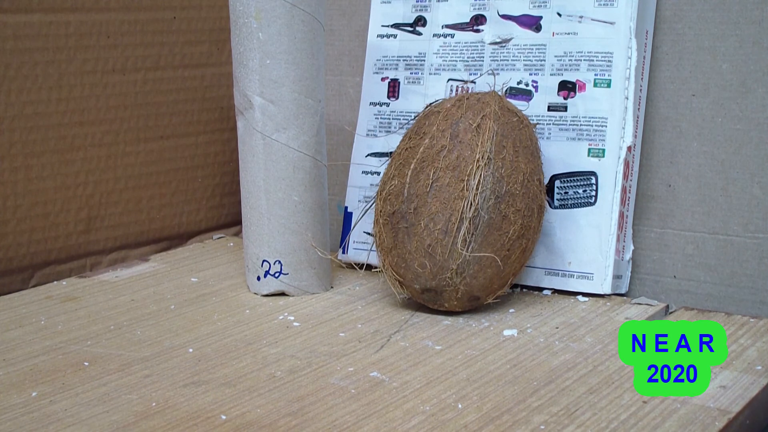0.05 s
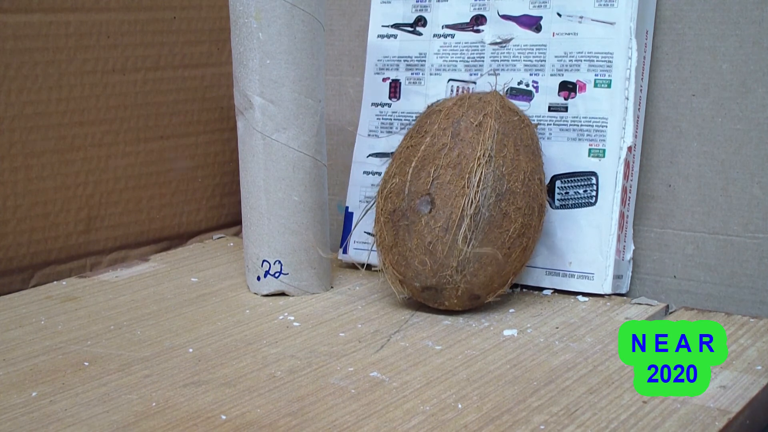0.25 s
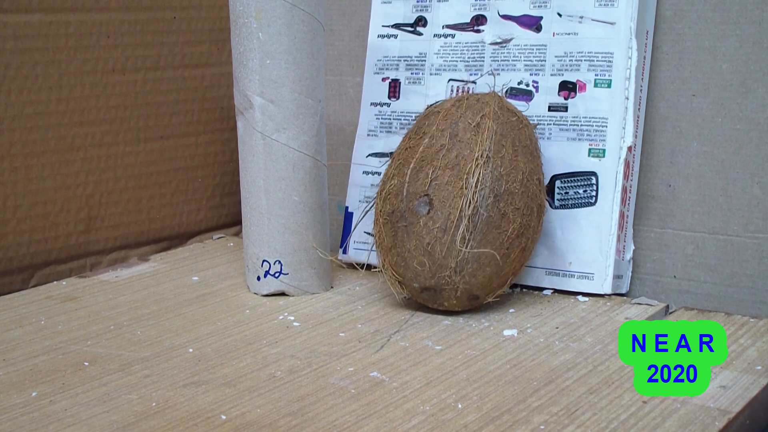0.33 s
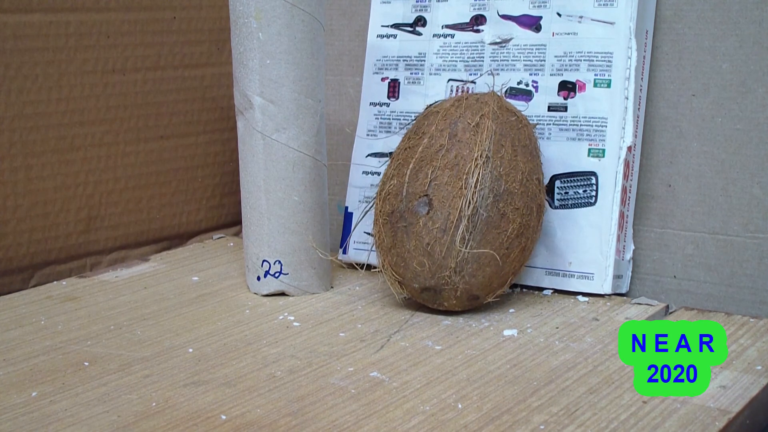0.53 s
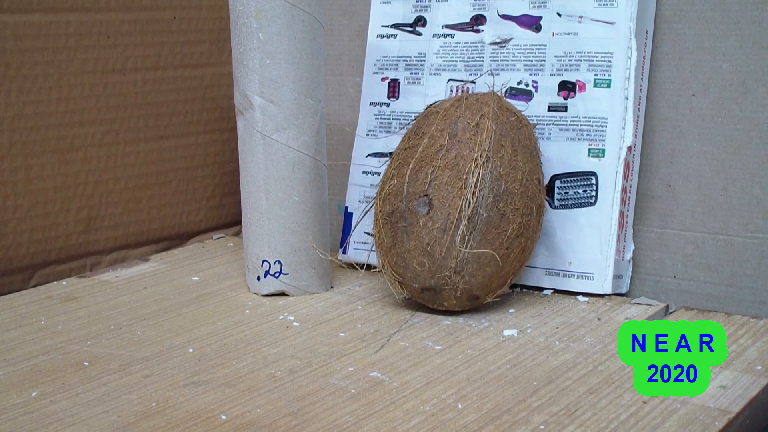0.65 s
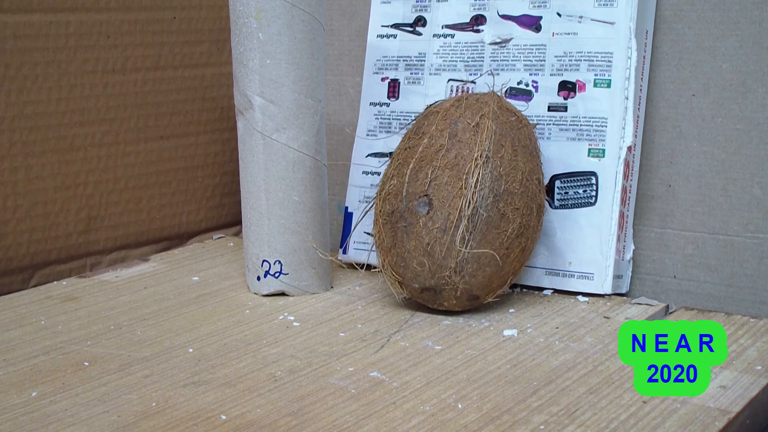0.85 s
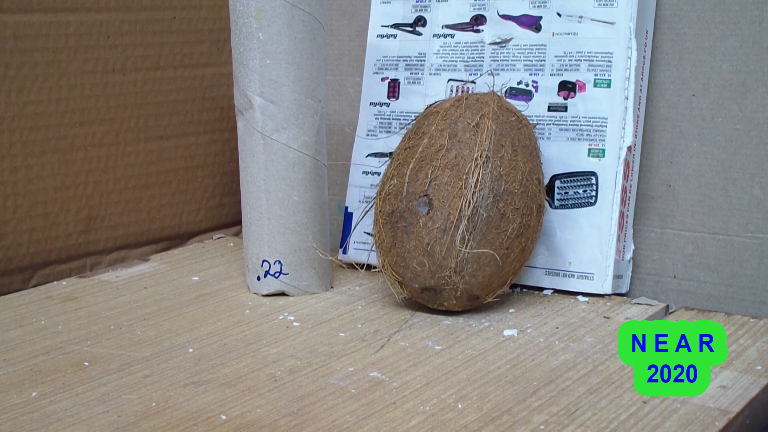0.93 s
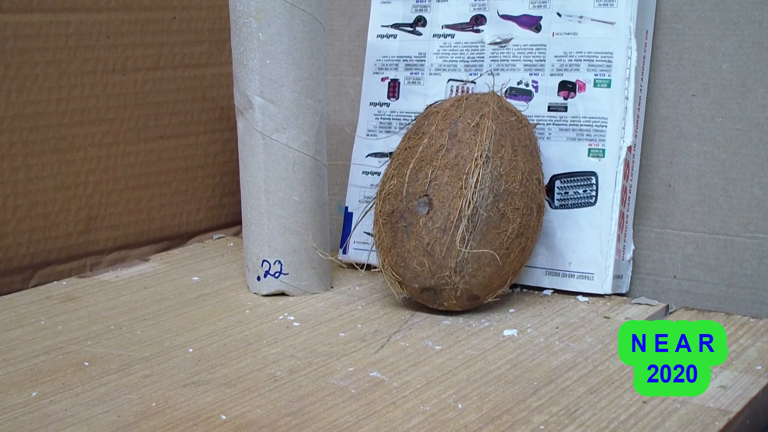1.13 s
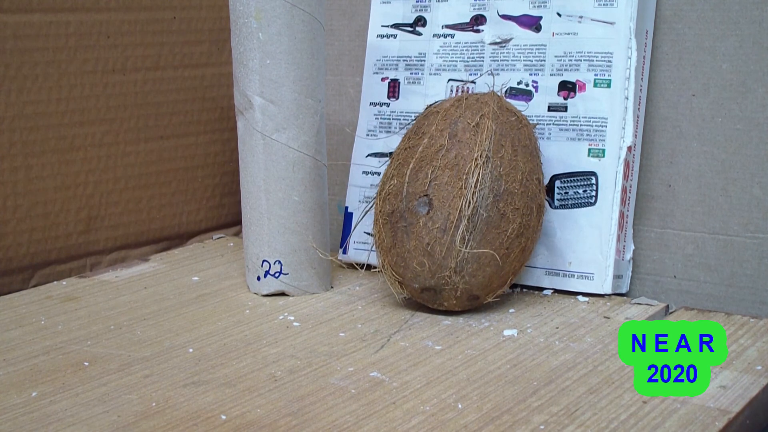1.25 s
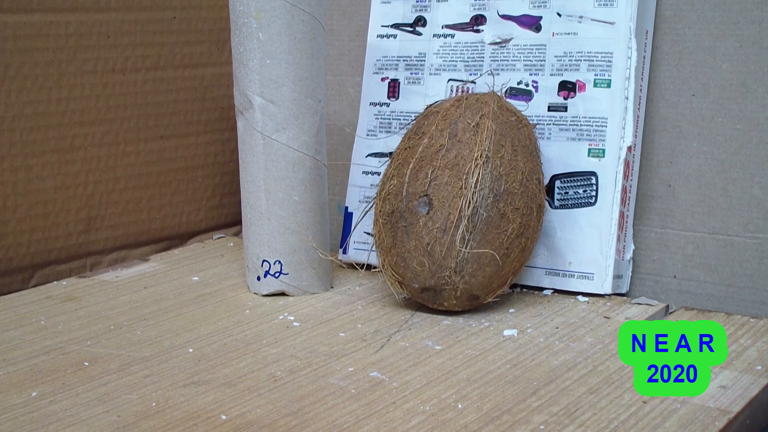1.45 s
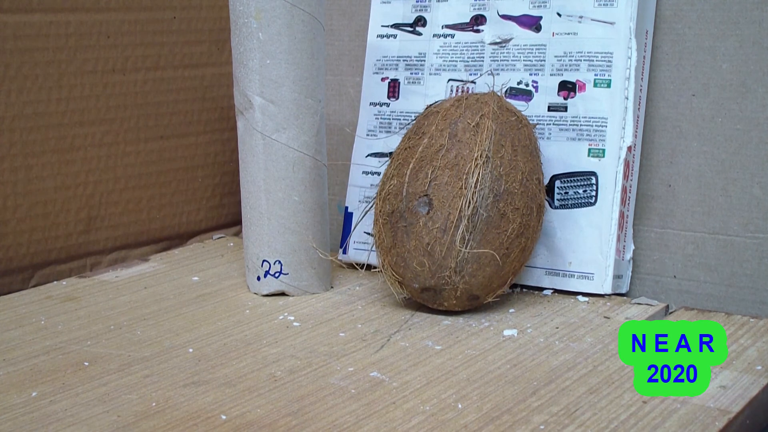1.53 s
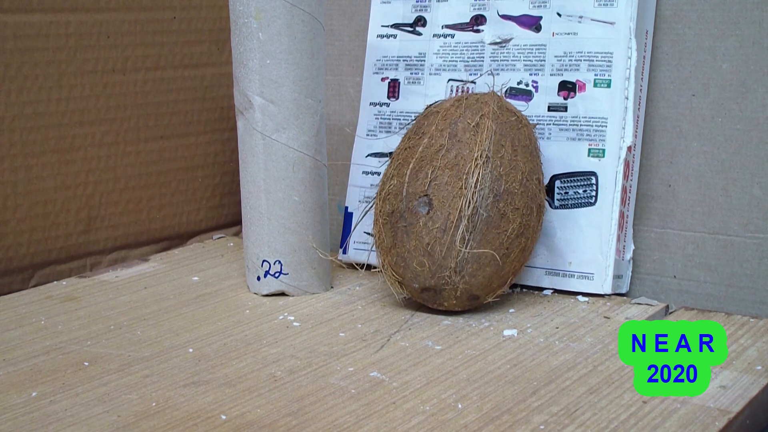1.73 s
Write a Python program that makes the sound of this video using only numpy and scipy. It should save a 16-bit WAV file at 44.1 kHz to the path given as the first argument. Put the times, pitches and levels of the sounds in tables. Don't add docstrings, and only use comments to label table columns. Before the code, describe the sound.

A pellet cracks a coconut and an air rifle blast follows at once, overloading a small close microphone; a hard-walled shed rings briefly, then chips tick and bounce on wood, floor and tin.

```python
import sys
import numpy as np
from scipy import signal
from scipy.fft import rfft, irfft
from scipy.io import wavfile
from scipy.ndimage import uniform_filter1d

SR = 44100
rng = np.random.default_rng(int(sys.argv[2]) if len(sys.argv) > 2 else 0)


def bounce(signal):
    frames = np.transpose(np.atleast_2d(signal))
    limited = np.clip(frames, -1, 1)
    pcm = np.round(limited * 32767).astype(np.int16)
    wavfile.write(sys.argv[1], SR, pcm)


def volts_from_db(level):
    exponent = np.asarray(level, float) / 20
    return 10 ** exponent


N = 79380
T = np.arange(N) / SR
BLAST_S = .2408


def peak(x, hz, width):
    return signal.lfilter(*signal.iirpeak(min(hz, .45 * SR), hz / width, fs=SR), x)


def unit(x):
    return x / np.sqrt(np.mean(x ** 2))


def colour(points):
    hz = np.arange(N // 2 + 1) * SR / N + 1
    point_hz, point_db = np.transpose(points)
    level_db = np.interp(np.log(hz), np.log(point_hz), point_db)
    return unit(irfft(rfft(rng.standard_normal(N)) * volts_from_db(level_db), N))


def fade(start, t60):
    return (T >= start) * volts_from_db(-60 * np.maximum(T - start, 0) / t60)


def ringing(push, body):
    modes = [volts_from_db(db) * peak(push, hz, width) for hz, width, db in body]
    return sum((-1) ** k * mode for k, mode in enumerate(modes))


def strikes(body, hits):
    out = np.zeros((2, N))
    u = np.arange(2500) / SR
    rattle_db, rattle_t60_s = -10, .008
    for start_s, level_db, send_db, contact_s in hits:
        push = np.exp(-(u / contact_s - 2) ** 2)
        roughness = rng.standard_normal(len(u)) * volts_from_db(rattle_db - 60 * u / rattle_t60_s)
        chatter = np.convolve(push, roughness)[:len(u)]
        ring = np.array([ringing(push + chatter, body), ringing(push, body)])
        ring = ring / np.abs(ring).max(axis=1, keepdims=True)
        ring = ring * volts_from_db(np.array([[level_db], [level_db + send_db]]))
        i = int(start_s * SR)
        out[:, i:i + len(u)] += ring[:, :N - i]
    return out


# pitch_hz [Hz], level_db [dB per Hz]
GAS_SPECTRUM = [(59, -25), (100, 2), (950, -28.5), (1280, -20.5), (1650, -0.5), (2130, -17), (4670, -10),
                (10000, -14.5), (16000, -16.5)]


def gas_blast():
    push_db, push_s = 1, .0011
    rise_s, t60_s, send_db = .003, 0.068, 7.5
    u = T - BLAST_S
    dip = -volts_from_db(push_db) * np.sin(np.pi * np.clip(u / push_s, 0, 1)) * fade(BLAST_S, 4 * push_s)
    decay = np.where(u > rise_s, fade(BLAST_S + rise_s, t60_s), 1)
    gas = colour(GAS_SPECTRUM) * np.clip(u / rise_s, 0, 1) * decay
    return np.array([dip + gas, gas * volts_from_db(send_db)])


def shell_crack():
    crack_s, crack_hz, crack_db, rise_s, t60_s = .2342, 2000, -2, .0006, .005
    splinter_db, splinter_t60_s = -17, 0.084
    v = T - crack_s
    swell = np.where(v < 0, np.exp(np.minimum(v, 0) / rise_s), fade(crack_s, t60_s))
    snap = volts_from_db(crack_db) * np.cos(2 * np.pi * crack_hz * v) * swell
    return snap + volts_from_db(splinter_db) * colour(GAS_SPECTRUM) * fade(crack_s, splinter_t60_s)


# pitch_hz [Hz], width_hz [Hz], level_db [dB]
MUZZLE_MODES = [(235.4, 239, -2.5), (650, 610, 3.5), (1500, 1200, 4), (2974, 1300, 4), (5940, 4000, 3),
                (10800, 2000, 0.5)]
# start_s [s], level_db [dB], send_db [dB to the room], contact_s [s]
MUZZLE_PULSES = [
    (0.2425, -8.5, 36.36, 0.000044),
    (0.245, 4, 6, 0.000017),
    (0.2526, -10.5, 18, 0.00048),
]


def muzzle():
    return strikes(MUZZLE_MODES, MUZZLE_PULSES)


# pitch_hz [Hz], width_hz [Hz], level_db [dB]
SHELL_MODES = [(1850, 320, 1.5), (4300, 500, -1.5), (7240, 5400, -7), (12200, 5000, -14.5)]
# start_s [s], level_db [dB], send_db [dB to the room], contact_s [s]
SHELL_KNOCKS = [
    (.2345, -16, 2, 0.000024),
    (1.0732, -32.5, -0.5, 0.000046),
]


def shell():
    return strikes(SHELL_MODES, SHELL_KNOCKS)


# pitch_hz [Hz], width_hz [Hz], level_db [dB]
BOARD_MODES = [(335, 113, 10), (502, 81, 8.5), (657, 150, 8.5), (1327, 1200, 5.5), (1785, 236, 9.5),
               (2215, 304, 2.5), (5000, 4000, -7.5), (9800, 3500, -14), (14700, 2000, -17)]
# start_s [s], level_db [dB], send_db [dB to the room], contact_s [s]
BOARD_KNOCKS = [
    (0.9645, -14, 1, 0.000027),
]


def board():
    return strikes(BOARD_MODES, BOARD_KNOCKS)


# pitch_hz [Hz], width_hz [Hz], level_db [dB]
CHIP_MODES = [(623, 81, 3), (1204, 630, -1), (2130, 2340, -1), (3130, 820, 6), (6100, 4500, -3),
              (9180, 1000, -32), (14100, 3000, -14)]
# start_s [s], level_db [dB], send_db [dB to the room], contact_s [s]
CHIP_BOUNCES = [
    (0.8107, -31.5, 10.5, 0.000067),
    (0.8147, -18.5, 4.5, .00005),
    (.8215, -18.5, -3, 0.000012),
    (.8278, -19, 0, 0.000048),
    (.934, -43, 8, 0.000064),
    (.9405, -36, 5, 0.000078),
]


def chip():
    return strikes(CHIP_MODES, CHIP_BOUNCES)


# pitch_hz [Hz], width_hz [Hz], level_db [dB]
TIN_MODES = [(740, 560, -10.5), (1320, 200, -0.5), (2130, 630, 1.5), (3650, 290, 8), (4010, 380, 5.5),
             (6950, 2300, -10), (14640, 2300, -20)]
# start_s [s], level_db [dB], send_db [dB to the room], contact_s [s]
TIN_TAPS = [
    (1.7444, -23.5, 3.4, 0.000031),
    (1.7464, -23, 2, 0.00007),
    (1.7474, -22.5, 5.2, 0.000038),
    (1.758, -25.5, 4.3, 0.000067),
    (1.76, -37.5, 2.4, 0.000055),
]


def tin():
    return strikes(TIN_MODES, TIN_TAPS)


# pitch_hz [Hz], width_hz [Hz], level_db [dB]
GRIT_MODES = [(6050, 2300, 4.5), (9030, 3496, -1.5), (14500, 4700, 1.5)]
# start_s [s], level_db [dB], send_db [dB to the room], contact_s [s]
GRIT_TICKS = [
    (.4716, -21, -20, 0.000021),
    (0.4726, -10.5, -7, 0.000021),
    (0.7683, -33, 2, 0.000015),
    (1.589, -43.5, 10.5, 0.000036),
    (1.597, -57, 8, .00003),
]


def grit():
    return strikes(GRIT_MODES, GRIT_TICKS)


# pitch_hz [Hz], width_hz [Hz], level_db [dB]
SCRAP_MODES = [(950, 310, -1), (1500, 490, 1.5), (2460, 930, -0.5), (4570, 2200, -2.5)]
# start_s [s], level_db [dB], send_db [dB to the room], contact_s [s]
SCRAP_BOUNCES = [
    (1.501, -31.5, 11, 0.000089),
    (1.553, -52, 2, 0.000073),
    (1.59, -42.5, 12.5, 0.00007),
    (1.657, -43, 7, 0.000037),
    (1.668, -48, 9, .0001),
]


def scrap():
    return strikes(SCRAP_MODES, SCRAP_BOUNCES)


# pitch_hz [Hz], level_db [dB], t60_s [s]
PANEL_MODES = [(16.26, -0.5, 0.31), (30, -6.5, 0.3), (76.1, -22.5, 0.48), (98, 16, 0.083),
               (135.5, -6.5, 0.45), (142, -33, 1.0), (205, -37.5, 0.67), (195, -35, 1), (215, -28, 0.83),
               (216.5, 14.5, 0.092)]


def panels():
    rise_s = 0.045
    u = T - BLAST_S
    boom = sum(volts_from_db(db) * np.sin(2 * np.pi * hz * u) * fade(BLAST_S, t60) for hz, db, t60 in PANEL_MODES)
    return boom * np.clip(u / rise_s, 0, 1)


# pitch_hz [Hz], level_db [dB], t60_s [s]
ROOM_BANDS = [(189, -5.5, 0.49), (540, 3, 0.29), (1280, -3, 0.32), (2500, 2, 0.35), (4740, 2.5, 0.36),
              (9000, 6.5, 0.31), (14000, -22.5, 0.6)]


def room():
    gap_s, fill_s, grain_db = .0006, .003, 2
    early_db, early_t60_s = -4, 0.15
    tail = np.zeros(N)
    for hz, db, t60 in ROOM_BANDS:
        tail += volts_from_db(db) * peak(rng.standard_normal(N), hz, hz) * fade(gap_s, t60)
    lumps = volts_from_db(grain_db * unit(uniform_filter1d(rng.standard_normal(N), size=40)))
    tail = tail * lumps * np.clip((T - gap_s) / fill_s, 0, 1)
    tail = tail * (1 + volts_from_db(early_db) * fade(0, early_t60_s))
    return tail / np.sqrt(np.sum(tail ** 2))


# pitch_hz [Hz], level_db [dB per Hz]
AIR_SPECTRUM = [(20, -2), (60, -11.5), (160, -16.5), (380, -17.5), (1000, -23), (2200, -20.5),
                (6000, -28.5), (16000, -37.5)]
# pitch_hz [Hz], width_hz [Hz], level_db [dB]
HUM_BANDS = [(1565, 24, -68), (2020, 120, -64.5), (15650, 150, -76.5), (61.5, 27, -64.5), (785, 100, -71)]


def air():
    air_db, wander_db = -54, .6
    rustle_s, rustle_rise_s, rustle_hz, rustle_db = 1.67, 0.013, 12400, -58
    walk = unit(uniform_filter1d(uniform_filter1d(rng.standard_normal(N), 4000), 4000))
    hiss = volts_from_db(air_db + wander_db * walk) * colour(AIR_SPECTRUM)
    hum = sum(volts_from_db(db) * unit(peak(rng.standard_normal(N), hz, width)) for hz, width, db in HUM_BANDS)
    rustle = unit(peak(peak(rng.standard_normal(N), rustle_hz, 8600), rustle_hz, 12000))
    rustle = volts_from_db(rustle_db) * rustle * np.clip((T - rustle_s) / rustle_rise_s, 0, 1)
    return hiss + hum + rustle


def scene():
    direct, send = gas_blast() + muzzle() + shell() + board() + chip() + tin() + grit() + scrap()
    direct = direct + shell_crack() + panels()
    echoes = signal.fftconvolve(send, room())[:N]
    return (direct + echoes + air())[None]


def band_limit(x):
    return signal.sosfilt(signal.butter(12, 17040, fs=SR, output="sos"), x)


def record(dry):
    duck_db, duck_s, back_s = -29.5, .011, 0.48
    ceiling, top_hz = .54, 15800
    u = np.maximum(T - BLAST_S, 0)
    recovery = np.clip((back_s - T) / (back_s - BLAST_S), 0, 1)
    gain_db = duck_db * (1 - np.exp(-u / duck_s)) * recovery
    overloaded = ceiling * np.tanh(dry * volts_from_db(gain_db) / ceiling)
    top = signal.ellip(8, .3, 45, top_hz, fs=SR, output="sos")
    return band_limit(signal.sosfilt(top, overloaded))


dry = scene()
out = record(dry)
bounce(out)
```